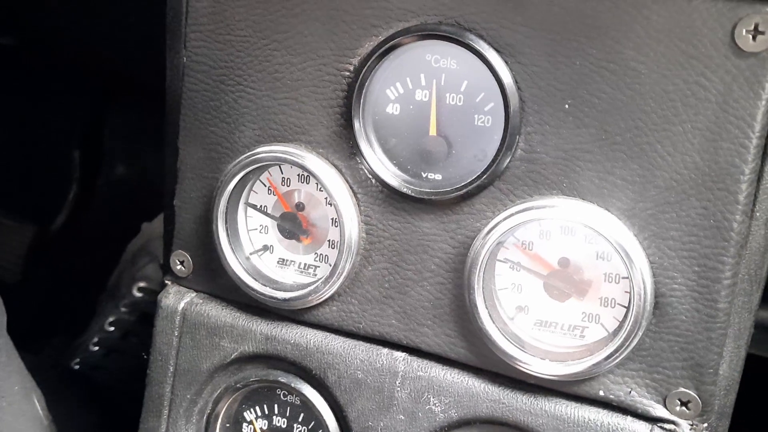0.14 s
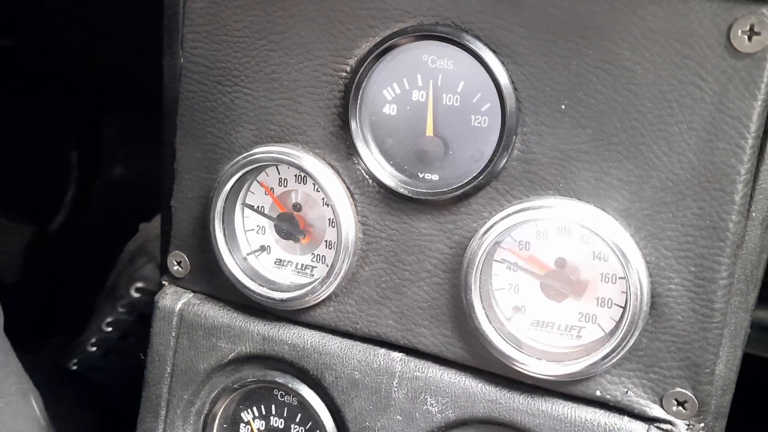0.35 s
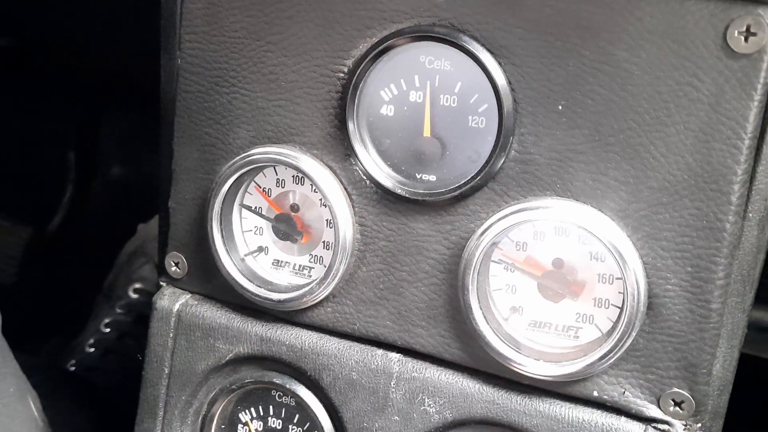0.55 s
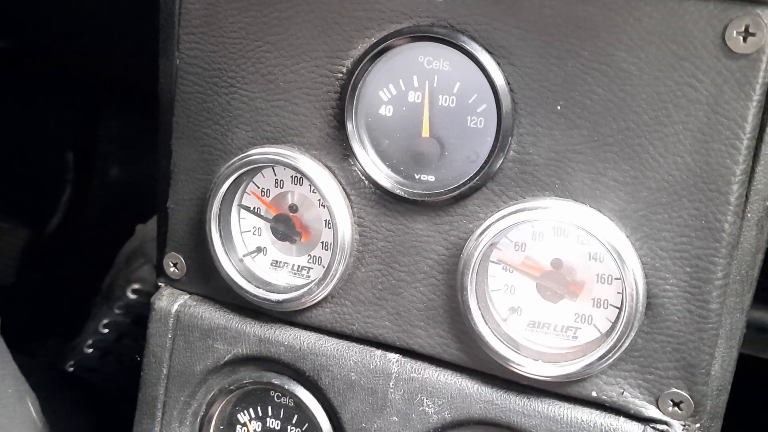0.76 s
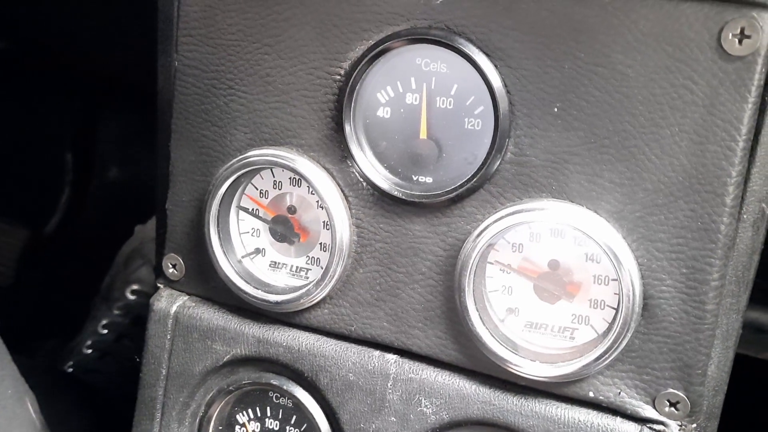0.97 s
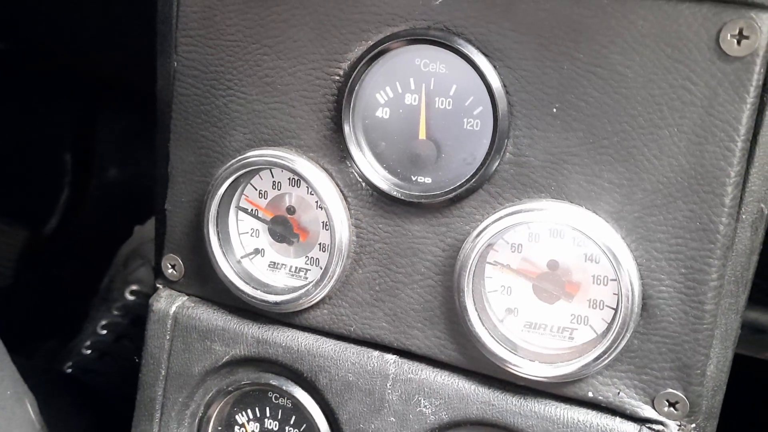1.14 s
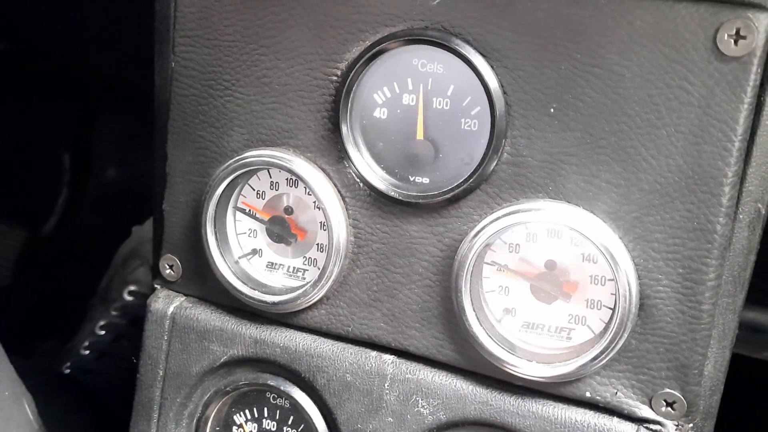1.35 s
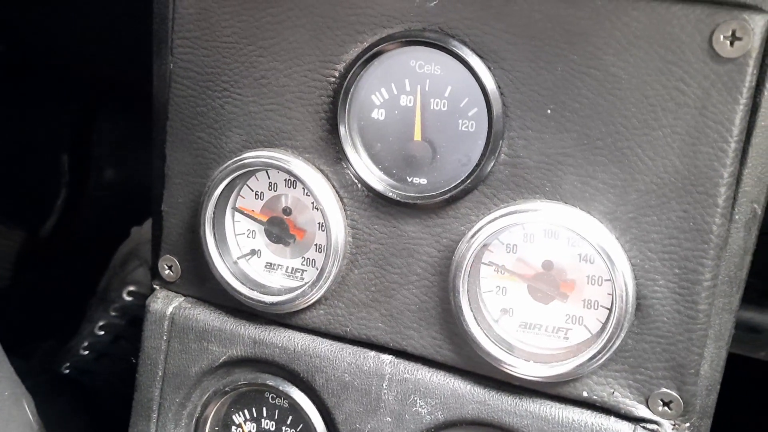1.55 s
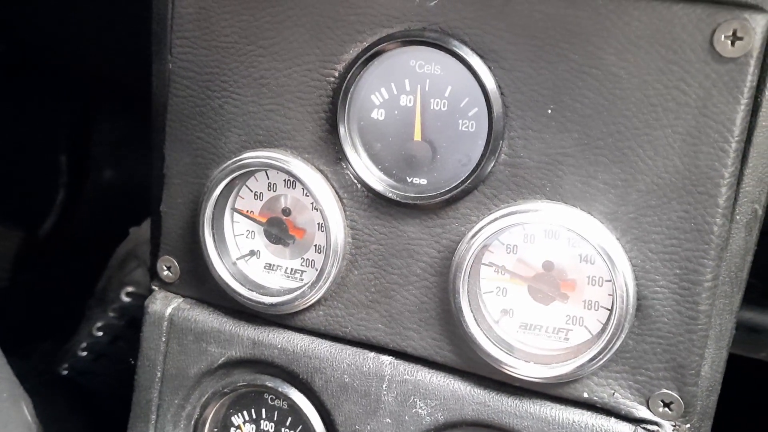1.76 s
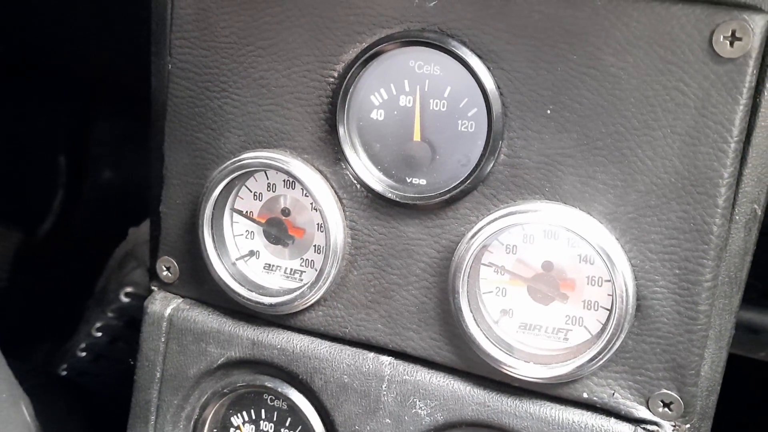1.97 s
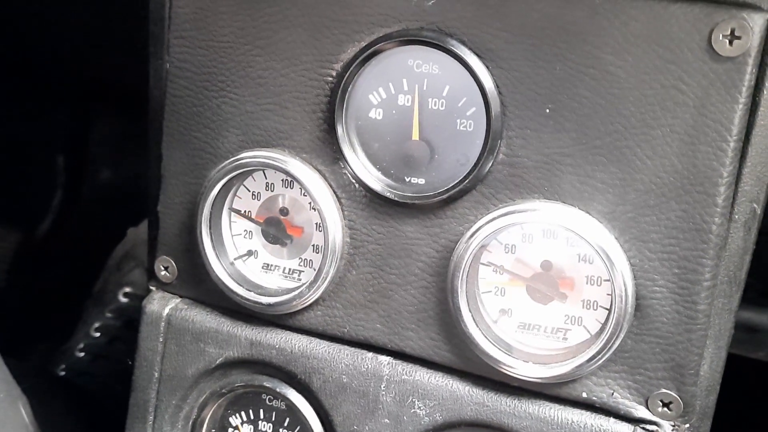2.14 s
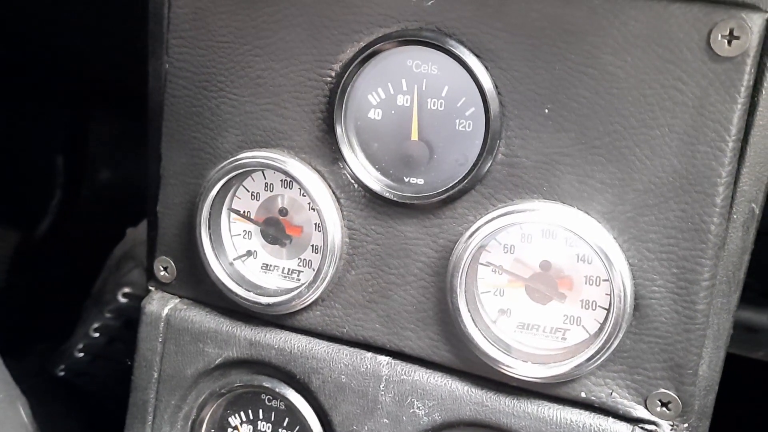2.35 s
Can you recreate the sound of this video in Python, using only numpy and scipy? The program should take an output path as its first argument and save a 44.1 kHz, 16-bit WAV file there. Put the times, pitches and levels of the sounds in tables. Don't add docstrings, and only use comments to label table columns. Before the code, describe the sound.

Loud compressed air hisses from air suspension valves close by, bright and sharp at first, then breathier as a second valve takes over; an engine idles low underneath, in a dry car cabin, heard by a phone.

```python
import sys
import numpy as np
from scipy import signal
from scipy.fft import rfft, irfft
from scipy.io import wavfile
from scipy.ndimage import uniform_filter1d

SR = 44100
rng = np.random.default_rng(int(sys.argv[2]) if len(sys.argv) > 2 else 0)


def natural_amplitude(level_db):
    exponent = np.asarray(level_db, float) / 20
    return 10 ** exponent


def transcribe(signal):
    frames = np.atleast_2d(signal).T
    limited = np.clip(frames, -1, 1)
    pcm = np.round(limited * 32767).astype(np.int16)
    wavfile.write(sys.argv[1], SR, pcm)


N = 110250

# start_s, front_level_db, rear_level_db
VALVE_FLOW = [(0, -22.5, -32), (.3, -23, -29.5), (.6, -24, -29.5), (.9, -26.5, -27.5), (1.15, -27, -26.5),
              (1.35, -27.5, -24.5), (1.5, -30, -24.5), (1.7, -28.5, -26), (2.0, -34, -25.5),
              (2.25, -31, -26.5), (2.5, -30.5, -28)]
# pitch_hz, level_db (per Hz)
FRONT_JET = [(250, -34), (900, -21), (2050, -15), (3300, -4), (4600, 0), (7000, -5.5), (10500, -10),
             (14200, -20)]
# pitch_hz, level_db (per Hz)
REAR_JET = [(250, -18), (900, -11.5), (2050, -10.5), (3600, -0.5), (5500, -1.5), (8000, -3), (10800, -8),
            (14200, -18.5)]
# start_s, level_db
FLOOR_RUSH = [
    (0, -55.5),
    (.7, -58),
    (1.2, -60),
    (1.3, -47.5),
    (1.55, -45.5),
    (1.75, -48),
    (2.5, -50),
]
# pitch_hz, width_hz, level_db
REAR_VALVE = [(7300, 90, 4), (7750, 200, 9), (8100, 150, -3), (370, 60, 4), (900, 120, 3), (10810, 120, 2),
              (9050, 150, 2), (4900, 500, -2)]
# pitch_hz, width_hz, level_db
TRIM_AND_HOSES = [(500, 120, -4), (720, 50, -7), (1025, 25, -5), (1090, 80, 6), (1210, 60, -6), (1470, 65, 7),
                  (1570, 35, -7), (1650, 60, 4), (1780, 60, -5), (2060, 300, -6), (2310, 60, 3), (2400, 60, -3),
                  (2590, 50, 4),
                  (3195, 70, 6), (3310, 90, -4), (3480, 60, -9), (3620, 65, 7), (3750, 55, -8), (3880, 70, 5),
            (3980, 40, -4), (4040, 40, 4), (4110, 60, -3), (4215, 60, 6), (4300, 50, -4), (4375, 70, 2),
            (4530, 120, -3), (4725, 130, 4),
                  (5100, 110, 3), (5400, 150, 2), (5800, 120, -4), (6050, 60, -4), (6300, 200, 2), (7020, 80, -3),
         (9150, 250, 3), (9800, 70, 2), (10100, 70, 3), (10600, 100, -4), (10810, 130, 4), (11500, 200, -3),
         (13100, 300, -3), (13800, 150, 4)]
# start_s, rate_hz (firings)
IDLE_SPEED = [(0.0, 29.5), (0.08, 29.0), (0.21, 29.0), (0.82, 29.3), (1.41, 29.0), (1.68, 29.3),
              (2.21, 29.3), (2.5, 29.8)]
# multiple (of the firing rate), level_db
FIRING_OVERTONES = [(1, -13.5), (2, -0.5), (3, -10), (4, -11.5), (5, -7), (6, -12), (7, -35.5), (8, -32.5),
                    (9, -26), (10, -27.5)]
# start_s (centre), length_s, level_db
WEAK_FIRINGS = [
    (.553, .02, -16),
    (1.928, .022, -9),
    (2.2, .03, -4),
    (.82, .03, -3),
]
# pitch_hz, level_db (per Hz)
RUMBLE = [(15, -21), (40, 1), (70, 1.5), (130, -1), (180, 8), (215, -12.5), (400, -36)]
# start_s (centre), pitch_hz, width_hz, level_db
SIDE_PATCHES = [(.63, 11000, 1600, -41), (.792, 6950, 1500, -33), (1.558, 5250, 2300, -31),
                (1.558, 9350, 2300, -33), (1.79, 9000, 1600, -37)]
# pitch_hz, width_hz
THIN_BANDS = [(800, 1000), (2200, 1300), (6350, 250), (8150, 250), (10200, 900), (12900, 2900)]

RUSH_HZ, RUSH_WIDTH_HZ = 650, 900
SWELL_DB, FLICKER_DB = .4, .5
DULL_FROM_S, DULL_DB_PER_S, DULL_ABOVE_HZ = 1.34, -5, 10700
CABIN_T60_S, CABIN_DB = .05, -20
FIRING_DB, FIRING_WOBBLE, RUMBLE_DB = -39.5, .057, -50.5
FIRING_LAG_S, BOOM_LAG_RAD = .0055, 2.1
CYLINDERS, LOPE_DB, LOPE_START_CYCLES, FIRST_FIRING_CYCLES = 4, 1.6, .21, .2
THIN_S, THIN_LENGTH_S, THIN_DB = 2.019, .008, -22
PATCH_S, TOP_HZ = .016, 14260

TIME_S = np.arange(N) / SR


def level(x, db):
    return x * natural_amplitude(db) / np.sqrt(np.mean(x ** 2))


def curve(table, axis=1):
    table = np.array(table)
    return np.interp(TIME_S, table[:, 0], table[:, axis])


def shape(x, gain):
    return irfft(rfft(x) * gain(np.arange(N // 2 + 1) * SR / N + 1), N)


def colour(table):
    hz, db = np.transpose(table)
    return lambda f: natural_amplitude(np.interp(np.log(f), np.log(hz), db))


def ringing(table):
    return lambda f: natural_amplitude(sum(db / (1 + (2 * (f - hz) / width) ** 2) for hz, width, db in table))


def band(x, hz, width):
    return shape(x, lambda f: 1 / (1 + (2 * (f - hz) / width) ** 40))


def bump(at, length):
    return np.exp(-((TIME_S - at) / length) ** 2)


def walk(rate):
    hold = int(SR / rate)
    steps = np.repeat(rng.standard_normal(N // hold + 1), hold)
    return 1.15 * uniform_filter1d(uniform_filter1d(steps, hold), hold)[:N]


def jet(table, db):
    steady = level(shape(rng.standard_normal(N), colour(table)), 0)
    swell = SWELL_DB * walk(12.05)
    hiss = 0
    for octave in range(7, 15):
        part = shape(steady, lambda f: np.clip(1 - abs(np.log2(f) - octave), 0, 1))
        hiss = hiss + natural_amplitude(swell + FLICKER_DB * walk(16)) * part
    top = shape(hiss, lambda f: 1 / (1 + (DULL_ABOVE_HZ / f) ** 6))
    dulling = natural_amplitude(DULL_DB_PER_S * np.clip(TIME_S - DULL_FROM_S, 0, None))
    return natural_amplitude(db) * (hiss + top * (dulling - 1))


def floor_rush():
    def gain(f):
        hump = 1 / (1 + ((f - RUSH_HZ) / RUSH_WIDTH_HZ) ** 2 * 4)
        return hump / (1 + (250 / f) ** 4)
    return level(shape(rng.standard_normal(N), gain), 0) * natural_amplitude(curve(FLOOR_RUSH))


def cabin(air):
    t = np.arange(SR // 8) / SR
    ring = rng.standard_normal(len(t)) * natural_amplitude(-60 * t / CABIN_T60_S)
    ring = ring / np.sqrt(np.sum(ring ** 2))
    return air + natural_amplitude(CABIN_DB) * signal.fftconvolve(air, ring)[:N]


def vents():
    front = jet(FRONT_JET, curve(VALVE_FLOW, axis=1))
    rear = shape(jet(REAR_JET, curve(VALVE_FLOW, axis=2)), ringing(REAR_VALVE))
    return cabin(shape(front + rear + floor_rush(), ringing(TRIM_AND_HOSES)))


def engine():
    rate = curve(IDLE_SPEED)
    turn = 2 * np.pi * (np.cumsum(rate) / SR - FIRST_FIRING_CYCLES)
    uneven = LOPE_DB * np.cos(turn / CYLINDERS - 2 * np.pi * LOPE_START_CYCLES)
    uneven = uneven + sum(db * bump(at, length) for at, length, db in WEAK_FIRINGS)
    hum = 0
    for k, db in FIRING_OVERTONES:
        share = np.clip((k - 1) / 2, .15, 1) ** 2
        wobble = 1 + FIRING_WOBBLE * (.5 + share) * (walk(28.75) + 1j * walk(28.6))
        lag = np.pi * k * k * FIRING_LAG_S * np.mean(rate)
        lag = lag + BOOM_LAG_RAD * (k <= 2)
        hum = hum - natural_amplitude(db + uneven * share) * np.real(wobble * np.exp(1j * (k * turn - lag)))
    return level(hum, FIRING_DB)


def rumble():
    return level(shape(rng.standard_normal(N), colour(RUMBLE + [(2000, -85)])), RUMBLE_DB)


def scene():
    return np.tile(vents() + engine() + rumble(), (2, 1))


def low_pass(x):
    return signal.sosfilt(signal.butter(12, 14730, fs=SR, output="sos"), x)


def record(dry):
    weak = sum(band(dry[0], hz, width) for hz, width in THIN_BANDS)
    mid = dry[0] - (1 - natural_amplitude(THIN_DB)) * bump(THIN_S, THIN_LENGTH_S) * weak
    mid = shape(mid, lambda f: f < TOP_HZ)
    side = 0
    for at, hz, width, db in SIDE_PATCHES:
        gate = np.exp(-((TIME_S - at) / PATCH_S) ** 4)
        side = side + gate * level(band(rng.standard_normal(N), hz, width), db)
    return low_pass(np.array([mid + side, mid - side]))


dry = scene()
out = record(dry)
transcribe(out)
```